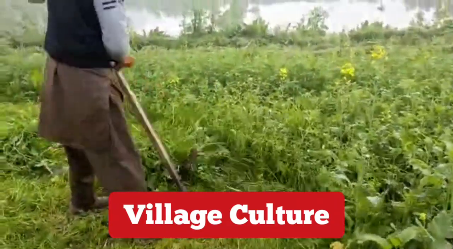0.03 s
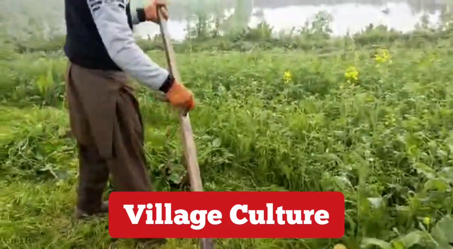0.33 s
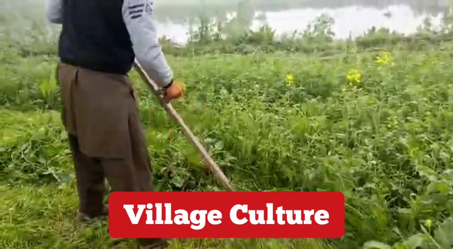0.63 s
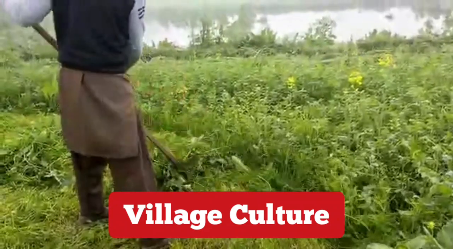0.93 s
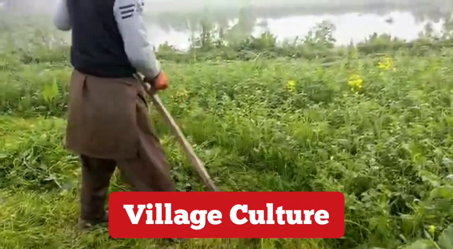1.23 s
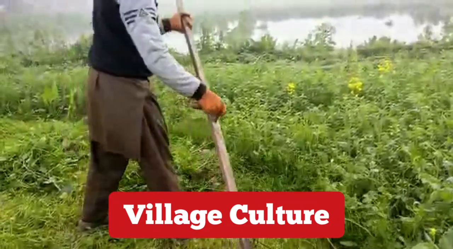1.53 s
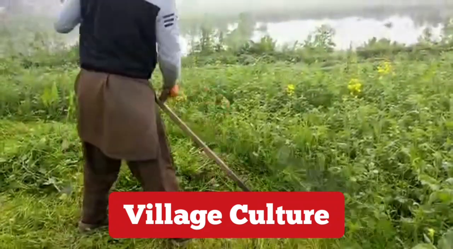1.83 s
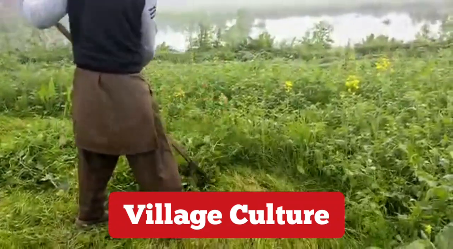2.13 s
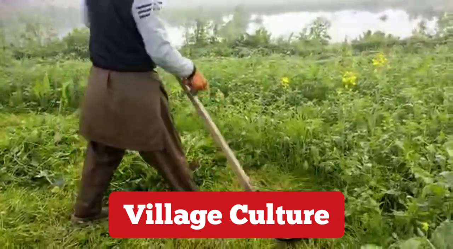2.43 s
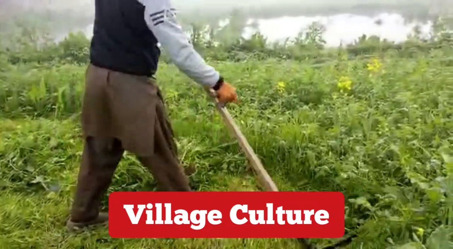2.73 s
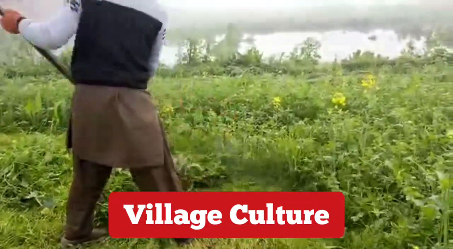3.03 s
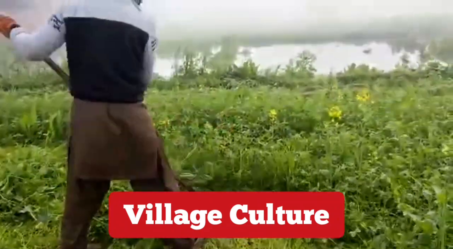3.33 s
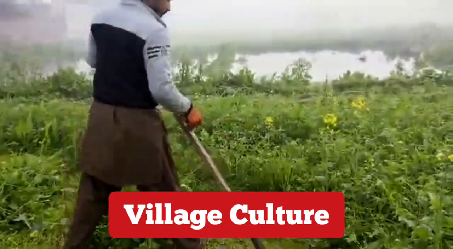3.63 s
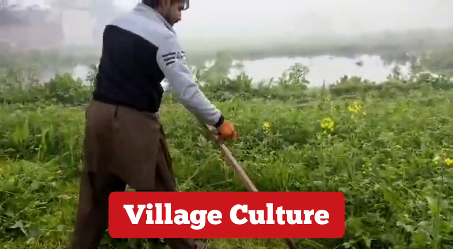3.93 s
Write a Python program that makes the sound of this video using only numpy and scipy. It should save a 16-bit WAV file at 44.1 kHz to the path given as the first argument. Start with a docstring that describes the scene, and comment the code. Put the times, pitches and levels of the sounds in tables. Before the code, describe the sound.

A scythe swishes and crunches through tall plants in steady strokes, with faint birds chirping.

```python
"""A scythe blade rasps back through wet leaves over a low outdoor rumble, while feet shuffle in the grass.
Four backswings alternate with three cutting strokes, each a dense crackle of severed stalks.
Fracture and friction give noise that the resonances of the steel colour; thick stems snap in sharp
cracks. Small birds whistle thin arcs of pitch, blurred by scattering from bushes and a pond's far bank."""
import sys
import numpy as np
from scipy import signal
from scipy.fft import rfft, irfft, next_fast_len
from scipy.io import wavfile
from scipy.ndimage import uniform_filter1d, map_coordinates

SR = 44100
rng = np.random.default_rng(int(sys.argv[2]) if len(sys.argv) > 2 else 0)


def dump_mix(stems):
    """Bounce the given channels to the path in sys.argv[1] as a 16-bit WAV at rate SR."""
    frames = np.atleast_2d(stems).T  # one column per channel
    limited = np.clip(frames, -1, 1)  # hard clip at full scale
    pcm = np.round(limited * 32767).astype(np.int16)
    wavfile.write(sys.argv[1], SR, pcm)


N = 176400
TIME_S = np.arange(N) / SR

# Levels in the tables are relative; balance is left minus right, read against AHEAD_DB.
# Course of each backswing, one list apiece: time_s, balance_db, scrape_db, hiss_db
BACKSWINGS = [
    [(0.0, -1, -42, -43.5), (0.09, -5, -45.5, -42), (0.145, -2, -41.5, -39), (0.22, -9, -49, -46.5),
     (0.348, -7, -41.5, -45), (0.454, -3.5, -52, -51.5), (0.52, -2.5, -45.5, -45)],
    [(1.05, -2, -57, -57), (1.126, -3, -49, -50.5), (1.21, -6, -48, -48.5), (1.29, -5, -44.5, -46),
     (1.43, -7, -51, -45), (1.49, -7.5, -44.5, -44.5), (1.62, 3, -55.5, -50.5)],
    [(2.23, -3, -67, -56), (2.26, -8, -60, -53.5), (2.334, -2, -54.5, -55.5), (2.412, -7.5, -54.5, -51),
     (2.53, -8, -45.5, -57), (2.6, -7, -47, -59), (2.726, -4, -62.5, -70.5), (2.79, -2, -62, -81)],
    [(3.4, 0, -61.5, -58), (3.552, -4, -49, -44.5), (3.602, -6, -49, -50), (3.722, -7, -49.5, -53.5),
     (3.81, 0, -59, -47.5), (3.89, -7, -59, -49.5), (4.0, -4, -68, -56)],
]
# Spectrum of the blade dragged over leaves: frequency_hz, left_db, right_db
DRAG_SPECTRUM = [(200, -23, -17), (354, -9, -9.5), (555, -20.5, -23), (772, -1.5, 2), (1035, -2, 2.5),
                 (1216, 4.5, 13.5), (1580, 6, 14.5), (1956, 4.5, 6), (2550, -2.5, -1), (3170, -5.5, -8.5),
                 (4330, -8, -14.5), (6180, -13.5, -24), (7170, -9.5, -31.5), (8470, -27, -37.5),
                 (12000, -29.5, -37.5), (15000, -34.5, -52)]
# Changing timbre of the backswings: time_s, body_db, sizzle_db
DRAG_TONE = [(0.0, 1, -0.5), (0.35, 6.5, 3), (0.47, -1.5, 1.5), (1.14, -12, 1), (1.5, 4.5, 0),
             (2.33, 2.5, 2.5), (2.55, -1.5, 8), (3.4, -0.5, -1), (3.68, 1.5, 4.5), (3.95, -2, -8)]
# Modes of the steel blade at a coupling of 1: centre_hz, width_hz, boost_db
BLADE_MODES = [(744.5, 50, 8.5), (1727, 29, 7), (2480, 122, 5.5), (3420, 54, -2), (6070, 92, 2.5),
               (7000, 180, 0)]
# Relation between the two microphone ports: frequency_hz, coherence (0-1), left_lead_rad
PORT_COHERENCE = [(100, 1, 0), (403, 1, -0.5), (520, 0.85, 1.25), (805, 0.97, 0.68), (1320, 0.83, 1),
                  (1860, 1, 1.58), (1840, 0.4, 1.5), (2100, 0.38, -2), (2700, 0.2, -5), (3140, 0.51, -2),
                  (3860, 0.47, -3), (6000, 0, -5.5), (8100, 0.1, -2)]
# Spectrum of the outdoor rumble: frequency_hz, level_db
RUMBLE_SPECTRUM = [(25, -40), (45, -35), (72, -1.5), (92, -5.5), (115, -1), (170, -8.5), (260, -15),
                   (500, -21), (1500, -58), (15000, -76)]
# Envelope of the rumble: time_s, level_db
RUMBLE_ENVELOPE = [(0.0, -44), (0.04, -50.5), (0.4, -62), (0.51, -53), (0.66, -81), (0.72, -65.5),
                   (1.61, -59.5), (1.97, -66), (2.83, -59), (2.95, -74.5), (3.5, -55.5), (3.82, -69),
                   (3.87, -59), (4.0, -57)]
# Spectrum of the field's hiss and of the grit on the steel: frequency_hz, level_db
HISS_SPECTRUM = [(100, 5.5), (500, -1), (1500, 0.5), (3000, 0.5), (6000, -3.5), (9000, -19), (15000, -16)]
# Feet shuffling in cut grass: start_s, length_s, level_db
STEPS = [(.005, 0.038, -37.5), (0.038, 0.12, -42), (0.17, 0.027, -38), (0.187, 0.1, -52),
         (1.089, 0.018, -55.5), (1.473, 0.14, -60.5), (1.631, 0.069, -48.5), (2.28, 0.024, -48),
         (2.395, 0.15, -50.5), (3.9, 0.15, -62.5)]
# Spectrum of plants crushed underfoot: frequency_hz, level_db
STEP_SPECTRUM = [(40, -45), (90, -3), (140, -3.5), (290, -2), (400, -7), (600, -12.5), (1200, -14),
                 (4000, -58)]
# Thick stems snapping: start_s, level_db, tilt_db_per_octave
SNAPS = [(0.159, -26, 1), (.353, -20, 1.5), (.570, -25, 4.5), (0.673, -18.5, -3), (0.803, -22, -6),
         (0.886, -24, -8), (1.405, -37, 6), (1.526, -30.5, 9), (1.807, -24, 10), (1.824, -30.5, 7),
         (1.87, -23, -5), (1.895, -19, -10.5), (1.924, -21, -4), (1.97, -20, -4), (2.036, -22.5, -1),
         (2.971, -18, -2), (3.05, -27, 7.5), (3.062, -15.5, 1.5), (3.571, -31, 7)]
# Course of each cutting stroke, one list apiece: time_s, balance_db, crunch_db, hiss_db, heap_db
CUTS = [
    [(0.53, -1, -57, -49, -64), (0.572, -7, -37, -42, -50.5), (0.61, -7, -41, -45.5, -50),
     (0.68, -8, -36.5, -39, -46), (0.79, -6.5, -35, -38.5, -48), (0.92, -2, -41.5, -44, -51.5),
     (0.992, -2, -45.5, -49.5, -54.5), (1.07, 0, -62.5, -56, -66)],
    [(1.62, 4, -56, -47, -55), (1.675, 0, -52.5, -49.5, -51), (1.72, -5.5, -45, -44, -50.5),
     (1.83, -8, -34.5, -38.5, -48), (1.92, -6, -37.5, -40, -46), (2.02, -2.5, -37.5, -43, -49.5),
     (2.17, -0.5, -52, -52.5, -61), (2.23, 1, -60, -62.5, -93)],
    [(2.79, -4, -72, -74, -84), (2.835, -6.5, -51, -53, -78), (2.88, -8, -38.5, -46, -57),
     (2.97, -7, -37, -42.5, -58.5), (3.06, -7.5, -38, -40.5, -49.5), (3.18, -4.5, -41, -43, -50),
     (3.27, -1, -52, -51, -56.5), (3.4, 7, -69.5, -64.5, -81)],
]
# Spectrum of stalks being cut: frequency_hz, left_db, right_db
CUT_SPECTRUM = [(70, -64, -64), (165, -34, -33.5), (327, -19.5, -19.5), (540, -27, -26.5), (860, -11.5, -8),
                (990, -10, -5), (1350, -5, 2.5), (1870, -7, 2), (2150, -8.5, -3.5), (2240, -2.5, -3),
                (2680, -9, -4.5), (3730, -8, -12), (5600, -16, -18.5), (7180, -10.5, -28.5),
                (8640, -27.5, -33.5), (12100, -29, -35), (15100, -34, -58)]
# Steel rasping where it bites or scrapes: start_s, length_s, resonance_hz, level_db
RASPS = [(0.548, 0.046, 2470, -40), (0.583, 0.28, 815, -47.5), (0.743, 0.22, 2460, -40.5),
         (1.049, 0.21, 2450, -43.5), (2.92, 0.23, 2480, -38), (3.742, 0.25, 2650, -48.5)]
# Bird chirps: start_s, length_s, first_hz, middle_hz, last_hz, level_db
CHIRPS = [(0.963, 0.091, 4930, 5540, 5450, -51.5), (1.015, 0.045, 4940, 3980, 3350, -39),
          (1.061, 0.04, 3210, 3500, 2980, -45), (1.094, 0.088, 5070, 5480, 5340, -44.5),
          (1.232, 0.065, 5000, 5490, 5140, -45.5), (1.44, 0.034, 2194, 1900, 1650, -46),
          (1.686, 0.033, 5330, 4790, 4420, -40), (2.101, 0.027, 5000, 5300, 5570, -49),
          (2.144, 0.051, 5900, 6420, 6130, -43), (2.134, 0.024, 2730, 2984, 3030, -45),
          (2.566, 0.082, 4600, 4100, 2890, -48), (2.654, 0.044, 3530, 3330, 3100, -49),
          (3.215, 0.039, 5100, 5500, 4750, -44), (3.25, 0.022, 6940, 6340, 5600, -47),
          (3.515, 0.041, 3730, 3450, 3330, -45.5), (3.815, 0.036, 4230, 3870, 3830, -46),
          (3.868, 0.018, 4580, 5200, 6600, -40), (3.888, 0.019, 6920, 5600, 4700, -37.5),
          (3.952, 0.04, 2780, 2500, 2180, -47.5)]

AHEAD_DB, HISS_PAN_SHARE = -6.5, 0.42  # balance of a blade straight ahead; how far hiss follows the pan


def amp(db):
    """Amplitude grows tenfold every 20 decibels."""
    return 10 ** (np.asarray(db) / 20)


def unit(x):
    """Normalisation to an rms of 1."""
    return x / np.sqrt(np.mean(x ** 2) + 1e-20)


def along(points, hz):
    """Interpolation of each table column on a log-frequency axis."""
    knots_hz, *columns = np.transpose(points)
    return np.array([np.interp(np.log(hz + 1), np.log(knots_hz + 1), column) for column in columns])


def wobble(rate_hz):
    """Smooth random modulation: a spline through evenly spaced random knots."""
    knots = rng.standard_normal(int(N * rate_hz / SR) + 4)
    return map_coordinates(knots, [TIME_S * rate_hz])


def filtered(x, response):
    """Linear filtering multiplies the spectrum by a frequency response."""
    size = next_fast_len(N + SR // 2)
    return irfft(rfft(x, size) * response(np.fft.rfftfreq(size, 1 / SR)), size)[..., :N]


def lowpass(x, edge_hz, order):
    """Zero-phase roll-off, with half amplitude at the edge."""
    return filtered(x, lambda hz: 1 / (1 + (hz / edge_hz) ** order))


def ports(pair, spectrum):
    """Partial coherence: two microphone ports share part of one source, shifted in phase."""
    left, unrelated = pair
    coherence = lambda hz: np.clip(along(PORT_COHERENCE, hz)[0], 0, 1)
    shared = filtered(left, lambda hz: coherence(hz) * np.exp(-1j * along(PORT_COHERENCE, hz)[1]))
    right = shared + filtered(unrelated, lambda hz: np.sqrt(1 - coherence(hz) ** 2))
    return filtered(np.array([left, right]), lambda hz: amp(along(spectrum, hz)))


def stereo_noise(envelope, spectrum):
    """Amplitude-modulated noise, coloured and heard at both ports."""
    return ports(envelope * rng.standard_normal((2, N)), spectrum)


def crackle(rate_hz, spread_db, life_s, rubbing, clump_db):
    """Shot-noise envelope: the decaying powers of random fibre breaks add to that of steady rubbing."""
    chance, size = rng.random(N), np.minimum(rng.exponential(size=N), 3)
    breaks = (chance < rate_hz / SR) * amp(spread_db * size) ** 2
    power = signal.lfilter([1], [1, -np.exp(-1 / (life_s * SR))], breaks)
    return np.sqrt(power / power.mean() + rubbing) * amp(clump_db * wobble(70))


def swings(tables, turn_s=0.048):
    """Stereo pan and a gain for each level column; swings add in power and fade as the blade turns."""
    power = 0
    for rows in tables:
        times, _, *levels_db = np.transpose(rows)
        fade = np.clip(.5 + np.minimum(TIME_S - times[0], times[-1] - TIME_S) / turn_s, 0, 1)
        power = power + fade * np.array([amp(np.interp(TIME_S, times, db)) ** 2 for db in levels_db])
    times, balance_db = np.vstack(tables).T[:2]
    pan_db = np.interp(TIME_S, times, balance_db) - AHEAD_DB
    return amp([pan_db / 2, -pan_db / 2]), *np.sqrt(power)


def blade(x, coupling):
    """Forced vibration: the modes of the steel colour whatever rubs it."""
    def modes(hz):
        return sum((amp(db) - 1) * 1j * hz * width / (centre ** 2 - hz ** 2 + 1j * hz * width)
                   for centre, width, db in BLADE_MODES)
    return filtered(x, lambda hz: 1 + coupling * modes(hz))


def patchy(x, depth_db):
    """Random spectral modulation: each clump of plants sounds a little different."""
    spectra = signal.stft(x, nperseg=1024)[2]
    patches = uniform_filter1d(rng.standard_normal(spectra.shape[1:]), size=4, axis=0)  # over frequency
    patches = uniform_filter1d(patches, size=6, axis=1)  # over time
    return signal.istft(spectra * amp(depth_db * unit(patches)), nperseg=1024)[1][:, :N]


def bands(x):
    """A crossover into low, middle and treble, each divided by the rms of its core band."""
    low, below_treble = lowpass(x, edge_hz=617, order=8), lowpass(x, edge_hz=2927, order=8)
    cores_hz = [(180, 600), (900, 2400), (3000, 8000)]
    core_rms = [filtered(x.mean(0), lambda hz: (hz > lo) & (hz < hi)).std() for lo, hi in cores_hz]
    return [part / rms for part, rms in zip([low, below_treble - low, x - below_treble], core_rms)]


def backswings(low_db=-17, scrape_db=-2, hiss_db=-0.5):
    """Friction noise: the blade's back brushes leaves and stubble, ringing more freely than in a cut."""
    pan, scrape, hiss = swings(BACKSWINGS)
    breaks = crackle(rate_hz=1100, spread_db=4, life_s=0.00053, rubbing=1.6, clump_db=1.2)
    leaves = blade(stereo_noise(breaks, DRAG_SPECTRUM), coupling=1.1)
    low, middle, treble = bands(patchy(leaves, depth_db=3.5))
    scraping = amp(scrape_db) * scrape * (pan * middle + amp(low_db) * low)
    hissing = amp(hiss_db) * hiss * pan ** HISS_PAN_SHARE * treble
    return backswing_tone(scraping + hissing)


def backswing_tone(swish):
    """Time-varying shelf filters make a backswing now hollow, now sizzling."""
    times, *levels_db = np.transpose(DRAG_TONE)
    body_gain, sizzle_gain = [amp(np.interp(TIME_S, times, db)) for db in levels_db]
    body = lowpass(swish, edge_hz=900, order=10)
    sizzle = swish - lowpass(swish, edge_hz=5460, order=20)
    return swish + (body_gain - 1) * body + (sizzle_gain - 1) * sizzle


def open_air(rumble_db=1.5, swell_db=1.5, incoherent_db=-7.5, hiss_db=-65):
    """Ambient noise: a wavering rumble, partly coherent between the ports, and the field's faint hiss."""
    incoherent = filtered(rng.standard_normal((2, N)), lambda hz: amp(along(RUMBLE_SPECTRUM, hz)))
    level_db = np.interp(TIME_S, *np.transpose(RUMBLE_ENVELOPE)) + rumble_db + swell_db * wobble(8.24)
    rumble = unit(stereo_noise(1, RUMBLE_SPECTRUM) + amp(incoherent_db) * incoherent)
    return amp(level_db) * rumble + amp(hiss_db) * unit(stereo_noise(1, HISS_SPECTRUM))


def feet(attack_s=0.005, release_s=0.067):
    """Crumpling: soft plants give way underfoot in dull bursts of shot noise."""
    pressure = 0
    for start, length, db in STEPS:
        rise = np.clip((TIME_S - start) / attack_s, 0, 1)
        fall = np.clip(.5 + (start + length - TIME_S) / release_s, 0, 1)
        pressure = pressure + amp(db) * rise * fall
    breaks = crackle(rate_hz=250, spread_db=4.5, life_s=0.00088, rubbing=0.58, clump_db=0)
    return pressure * unit(stereo_noise(breaks, STEP_SPECTRUM))


def stem_snaps(gain_db=6, crack_t60_s=0.009, splinter_t60_s=0.031, splinter_db=-10.5):
    """Fracture transients: a thick stem cracks, then splinters briefly; dry ones are brighter."""
    t, cracks = np.arange(SR // 8) / SR, np.zeros((2, N + SR))
    envelope = amp(-60 * t / crack_t60_s) + amp(splinter_db - 60 * t / splinter_t60_s)
    hz = np.fft.rfftfreq(len(t), 1 / SR)
    octaves = np.log2(np.clip(hz, 690, 7700) / 2100)  # the tilt pivots at 2100 Hz
    for start, db, tilt_db in SNAPS:
        noise = irfft(rfft(rng.standard_normal((2, len(t)))) * amp(tilt_db * octaves), len(t))
        cracks[:, round(start * SR):][:, :len(t)] += amp(db) * envelope * noise
    return amp(gain_db) * ports(cracks[:, :N], CUT_SPECTRUM)


def cutting_strokes(heap_db=-0.5, crunch_db=-1):
    """Superposed fractures: the edge severs hundreds of stalks and sweeps them into a heap."""
    pan, crunch, hiss, heap = swings(CUTS)
    breaks = crackle(rate_hz=1600, spread_db=3.5, life_s=0.00045, rubbing=1.7, clump_db=0.65)
    stalks = blade(stereo_noise(breaks, CUT_SPECTRUM), coupling=0.59)
    low, middle, treble = bands(patchy(stalks, depth_db=3))
    hissing = hiss * pan ** HISS_PAN_SHARE * falling_leaves(treble)
    return amp(heap_db) * heap * low + amp(crunch_db) * crunch * pan * middle + hissing


def falling_leaves(treble, low_hz=1850, high_hz=5650, rustle_change_db=11.5, sizzle_change_db=-6):
    """Shifting spectral balance: over a stroke the edge's sizzle yields to the rustle of falling leaves."""
    ends_s = [s for rows in CUTS for s in (rows[0][0], rows[-1][0])]
    progress = np.interp(TIME_S, ends_s, np.tile([-.5, .5], len(CUTS)))
    rustle = filtered(treble, lambda hz: 1 / (1 + (hz / high_hz) ** 12) / (1 + (low_hz / (hz + 1)) ** 12))
    return amp(rustle_change_db * progress) * rustle + amp(sizzle_change_db * progress) * (treble - rustle)


def steel_rasps(stage_q=9):
    """Stick-slip friction drives one resonance of the steel per rasp, swelling and fading."""
    slips = crackle(rate_hz=680, spread_db=3, life_s=0.00053, rubbing=1, clump_db=0.5)
    grit, rasps = stereo_noise(slips, HISS_SPECTRUM), 0
    for start, length, centre, db in RASPS:
        # two band-pass stages in series
        ring = filtered(grit, lambda hz: (1j * hz / (1j * hz + stage_q * (centre - hz ** 2 / centre))) ** 2)
        swell = np.sin(np.pi * np.clip((TIME_S - start) / length, 0, 1))
        rasps = rasps + amp(db) * swell * unit(ring)
    return rasps


def birds(waver_depth=0.01, flutter_db=3, right_db=-14.5):
    """Frequency modulation: each chirp is a fluttering whistle on a parabola through three pitches."""
    song = np.zeros(N + SR)
    waver = np.pad(waver_depth * wobble(700), (0, SR))
    flutter = np.pad(amp(flutter_db * wobble(160)), (0, SR))
    for start, length, first, middle, last, db in CHIRPS:
        progress = np.linspace(0, 1, int(length * SR))
        span = slice(int(start * SR), int(start * SR) + len(progress))
        arc = np.polyfit([0, .5, 1], [first, middle, last], 2)
        pitch_hz = np.polyval(arc, progress) * (1 + waver[span])
        envelope = amp(db) * np.sqrt(2 * abs(np.sin(np.pi * progress))) * flutter[span]
        song[span] += envelope * np.sin(2 * np.pi * np.cumsum(pitch_hz) / SR)
    return scattered(song[:N]) * amp([[0], [right_db]])


def scattered(call, t60_s=0.29, echo_db=-1.5):
    """Scattering from bushes and the far bank gives a distant call a short diffuse tail."""
    t = np.arange(SR // 2) / SR
    tail = rng.standard_normal((2, len(t))) * amp(-60 * t / t60_s)
    echo = signal.fftconvolve(call[None], tail / np.linalg.norm(tail[0]), axes=1)[:, :N]
    return call + amp(echo_db) * echo


def scene():
    """Superposition: the pressures from mower, birds and open air add."""
    mower = cutting_strokes() + backswings() + steel_rasps() + stem_snaps() + feet()
    return mower + birds() + open_air()


def record(dry):
    """Band limiting: nothing above 15600 Hz passes."""
    return filtered(dry, lambda hz: hz < 15600)


dry = scene()
out = record(dry)
dump_mix(out)
```